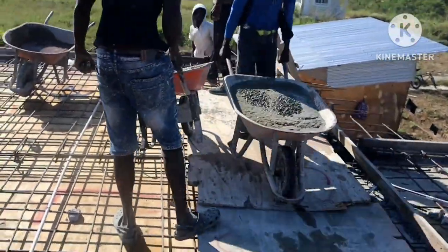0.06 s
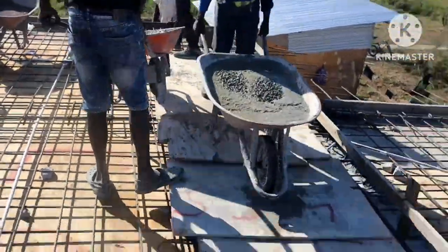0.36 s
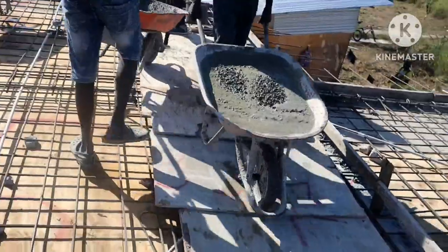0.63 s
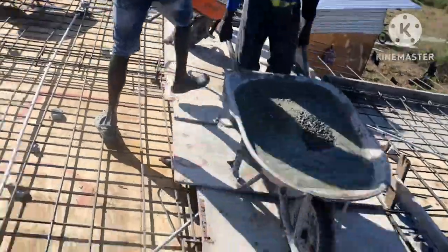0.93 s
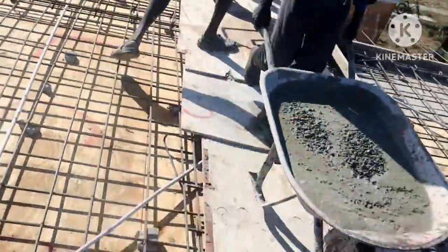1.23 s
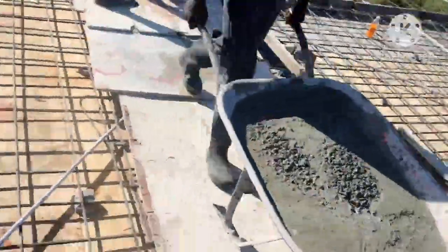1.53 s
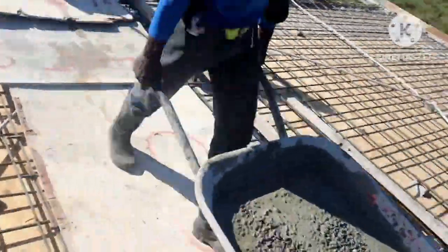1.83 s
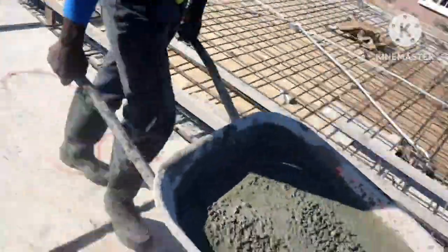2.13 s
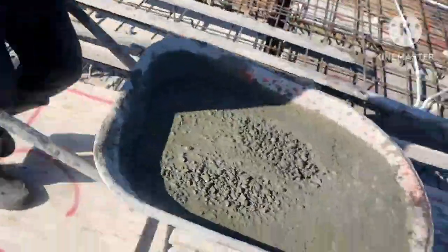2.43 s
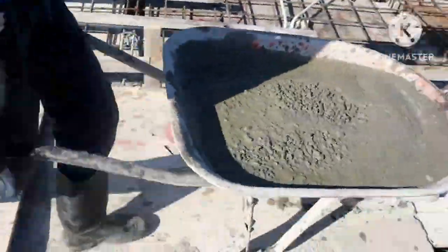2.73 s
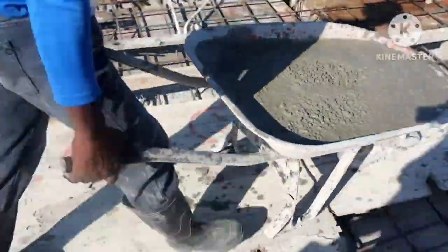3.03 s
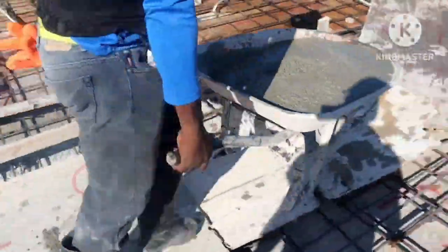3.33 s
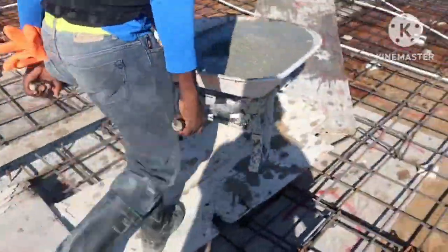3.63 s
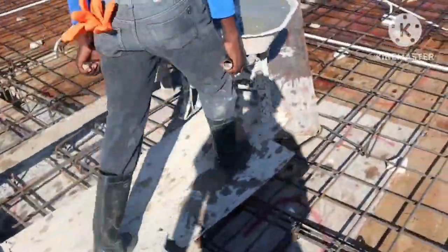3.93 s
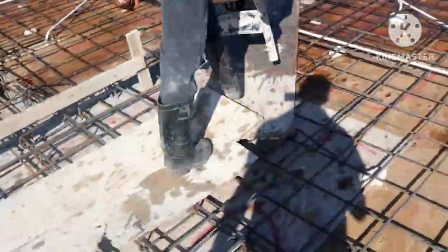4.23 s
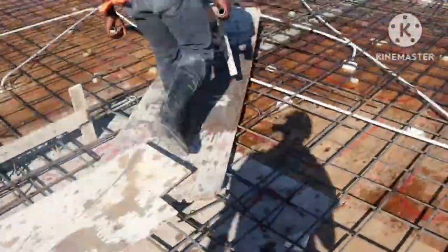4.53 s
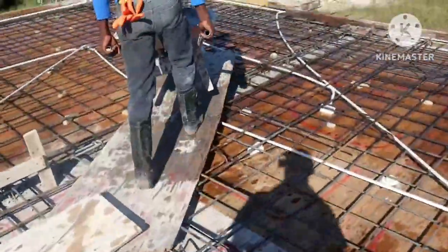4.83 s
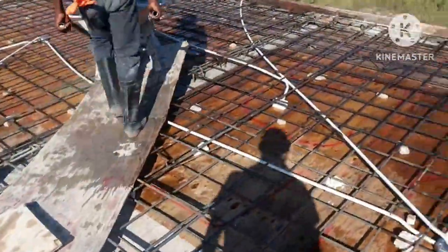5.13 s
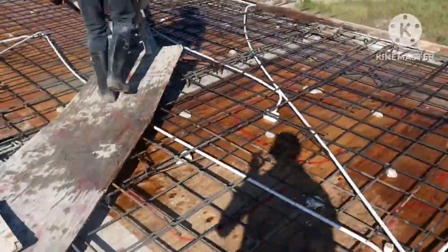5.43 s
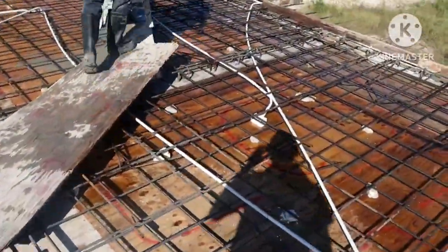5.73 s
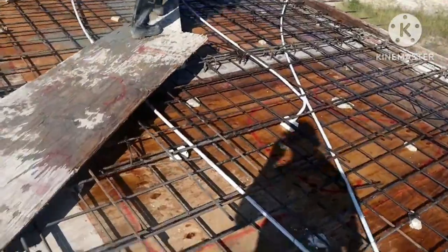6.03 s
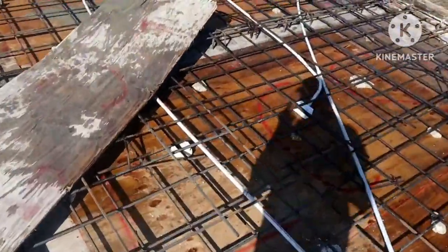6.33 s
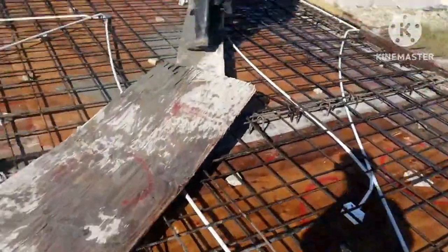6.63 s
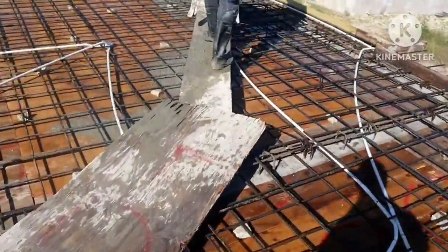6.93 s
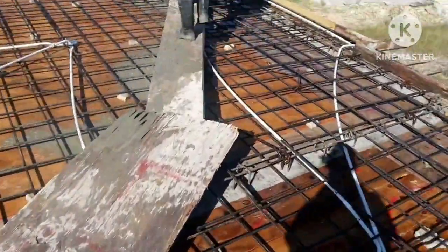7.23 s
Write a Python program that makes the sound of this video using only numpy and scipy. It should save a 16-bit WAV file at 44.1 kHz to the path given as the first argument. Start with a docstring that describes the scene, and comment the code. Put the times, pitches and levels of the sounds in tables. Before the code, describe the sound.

Gusty wind rushes on the microphone and a distant engine hums as a wheelbarrow bumps along boards in the open air. Hollow wooden knocks and metal clacks come thickly at first, mixed with gritty boot scuffs and ticking pebbles. The bass falls away as the barrow passes close by; afterwards the wind and engine build again, with rolling, scraping and sparser thuds.

```python
"""On a roof slab, a loaded wheelbarrow is pushed past over loose planks. The tyre rumbles and rocks the
boards; wheel and boots grind sand, snap small stones and knock the planks, and the steel tray clacks.
A small engine drones further off. Wind buffets the microphone, and the bass drops away while the
worker passes close by, sheltering it from the gusts and screening the engine."""
import sys
import numpy as np
from scipy import signal
from scipy.fft import rfft, irfft, next_fast_len
from scipy.io import wavfile
from scipy.ndimage import uniform_filter1d, map_coordinates

SR = 44100
rng = np.random.default_rng(int(sys.argv[2]) if len(sys.argv) > 2 else 0)


def transcribe(signal):
    """Save signal, clipped to [-1, 1], as a 16-bit WAV file at the path in sys.argv[1]."""
    frames = np.atleast_2d(signal).T
    limited = np.clip(frames, -1, 1)
    pcm = np.round(limited * 32767).astype(np.int16)
    wavfile.write(sys.argv[1], SR, pcm)


N = 329427
TIME = np.arange(N) / SR
AGE = np.arange(int(.4 * SR)) / SR  # seconds since a hit

# the wheel's steady rumble on the boards: time_s, level_db
WHEEL_RUMBLE = [(0, -28), (.5, -25), (.92, -30), (1.5, -25), (1.75, -31.5), (2.05, -27), (2.7, -34.5),
                (2.9, -32.5), (3.3, -27.5), (3.68, -38), (4.08, -37), (4.3, -27.5), (4.65, -31), (5.1, -29),
                (6.1, -24.5), (7.1, -32.5), (7.47, -27)]
# plank resonances: pitch_hz, level_db, t60_s (before a knock's damping factor)
PLANK_MODES = [(181.4, -2.5, 0.15), (219, 2.5, 0.13), (265.4, 1, 0.094), (349.4, 7.5, 0.081),
               (435, 13, 0.038), (528, 3, 0.15)]
# stereo width of wind and scuffs: frequency_hz, side_gain_db
NOISE_WIDTH = [(50, -24), (110, -18), (300, -13.5), (700, -11.5), (1290, -2.5), (2380, 4), (4400, 5.4),
               (15000, 3.8)]
# stereo width of rumble, ticks and knocks: frequency_hz, side_gain_db
IMPACT_WIDTH = [(200, -20), (700, -14), (1300, -9), (2400, -3), (4400, 0), (10000, 4)]


def amp(db):
    """Decibels to gain."""
    return 10 ** (np.asarray(db) / 20)


def unit(x):
    """Scaled to rms 1."""
    return x / np.sqrt(np.mean(x ** 2) + 1e-20)


def along(points, hz):
    """A curve of (frequency_hz, value) points, read on a log axis."""
    point_hz, values = np.transpose(points)
    return np.interp(np.log(hz + 1), np.log(point_hz + 1), values)


def curves(rows):
    """Automation: one value per sample for each column after the time."""
    times, *columns = np.transpose(rows)
    return [np.interp(TIME, times, column) for column in columns]


def wobble(rate):
    """A smooth random curve, rate knots a second."""
    return map_coordinates(rng.standard_normal(int(N * rate / SR) + 4), [TIME * rate])


def filtered(x, response):
    """x through an EQ whose gain is response(hz)."""
    size = next_fast_len(x.shape[-1] + 8192)
    return irfft(rfft(x, size) * response(np.fft.rfftfreq(size, 1 / SR)), size)[..., :x.shape[-1]]


def coloured(x, spectrum):
    """x given a spectrum, at rms 1."""
    return unit(filtered(x, lambda hz: amp(along(spectrum, hz))))


def patchy(x, depth_db):
    """x with a colour that shifts at random from moment to moment, at rms 1."""
    spectra = signal.stft(x, nperseg=1024)[2]
    patches = rng.standard_normal(spectra.shape[1:])
    for axis in (0, 1):
        patches = uniform_filter1d(patches, size=5, axis=axis)
    gain = amp(depth_db * np.tanh(unit(patches)))
    return unit(signal.istft(spectra * gain, nperseg=1024)[1][:, :N])


def grains(rate, spread_db, hiss):
    """Two trains of tiny impacts of uneven size over a bed of plain noise."""
    sizes = rng.standard_normal((2, N)) * amp(spread_db * np.clip(rng.standard_normal(N), -2, 2))
    impacts = unit(sizes * (rng.random(N) < rate / SR))
    return impacts + hiss * rng.standard_normal((2, N))


def ports(mid_side, width):
    """Left and right from mid and side; the microphone's two ports oppose each other in the treble."""
    side = filtered(mid_side[1], lambda hz: amp(along(width, hz)))
    return np.array([mid_side[0] + side, mid_side[0] - side])


def add(track, start_s, sound):
    """Mix a sound in at start_s."""
    part = track[..., max(round(start_s * SR), 0):][..., :sound.shape[-1]]
    part += sound[..., :part.shape[-1]]


def swell(peak_s, rise_s, fall_s):
    """An envelope that swells to a slightly rounded peak and fades."""
    return np.exp(-(np.abs(TIME - peak_s) / np.where(TIME < peak_s, rise_s, fall_s)) ** 1.6)


def decay(t60_s):
    """An envelope that falls 60 dB in t60_s."""
    return amp(-60 * AGE / t60_s)


def burst(x):
    """A hit scaled to the energy of 30 ms at rms 1."""
    return x / np.sqrt(np.sum(x ** 2, axis=-1, keepdims=True) / (.03 * SR))


def puff(low_hz, high_hz, t60_s, order=1):
    """Mid and side noise in a band, dying away."""
    high_hz = np.clip(high_hz, low_hz + 100, SR / 2 - 500)
    band = signal.butter(order, [low_hz, high_hz], "band", fs=SR, output="sos")
    return burst(signal.sosfilt(band, rng.standard_normal((2, len(AGE))) * decay(t60_s)))


def ring(modes, centre_hz, octaves, scatter_db, damping):
    """Modes struck at a new spot; the contact favours those near its own pitch."""
    hz, db, t60_s = np.transpose(modes)[:, :, None]
    detune, scatter = rng.standard_normal((2, len(modes), 1))
    level_db = db + scatter_db * scatter - 10 * (np.log2(hz / centre_hz) / octaves) ** 2
    partials = np.sin(2 * np.pi * hz * (1 + .04 * detune) * AGE)
    return np.sum(amp(level_db) * decay(t60_s / damping) * partials, axis=0)


def wind():
    """Eddies thump on the ports and a coarse, fluttering rush rides on them, brighter as it grows."""
    # strength of the rush of air: time_s, level_db
    strength = [(0, -25.5), (.5, -26.5), (1.05, -26.5), (1.3, -28.5), (1.6, -26.5), (2.1, -28),
                (2.65, -31.5), (2.9, -32), (3.3, -28), (4.08, -31), (4.35, -27.5), (4.65, -28.5),
                (5.15, -25), (6.05, -24.5), (6.5, -26), (6.85, -24.5), (7, -26.5), (7.47, -28)]
    # wind pressure on the microphone, sheltered while the worker passes: time_s, level_db
    gusts = [(0, -36), (.55, -29), (1.35, -29), (1.7, -37), (2.1, -25), (2.6, -32.5), (2.64, -57),
             (4.15, -67), (4.21, -39), (5.9, -40.5), (6.35, -26), (7.47, -28)]
    # tone of the low buffeting: frequency_hz, level_db
    buffet_eq = [(15, -22), (25, 4), (38, -6.5), (60, 4), (110, 3), (170, 1.5), (300, -6.5), (700, -83)]
    # tone of the rush: frequency_hz, level_db
    rush_eq = [(240, -20), (400, 2.5), (510, -3.5), (621, -1.5), (1170, -9), (1350, -8), (3240, -21.5),
               (6510, -32), (12300, -34.5), (13900, -34), (15000, -54)]
    eddies, strength_db = wobble(14), curves(strength)[0]
    buffet = amp(curves(gusts)[0] + 3.9 * eddies) * coloured(rng.standard_normal((2, N)), buffet_eq)
    air = patchy(coloured(grains(rate=900, spread_db=1.0, hiss=1.74), rush_eq), depth_db=3.5)
    shelf_hz, usual_strength_db = 200, -25.5
    lows = filtered(air, lambda hz: 1 / (1 + (hz / shelf_hz) ** 4))
    brightness = amp(0.58 * (strength_db - usual_strength_db))
    air = lows + brightness * (air - lows)
    flutter_db = 0.79 * eddies + 1.37 * wobble(60)
    rush = amp(strength_db + 0.5 + flutter_db) * air
    return ports(buffet + rush, NOISE_WIDTH)


def engine():
    """A small engine fires steadily, its harmonics wavering in the wind."""
    # harmonics of the firing rate: multiple, level_db
    harmonics = [(1, -4.5), (2, -9), (3, -10), (4, -9)]
    # the engine's loudness, screened while the worker passes: time_s, level_db
    loudness = [(0, -27.5), (1, -27), (2.58, -30.5), (2.66, -48), (4.1, -46), (4.5, -40.5), (5.2, -30),
                (6.6, -27), (7.47, -25.5)]
    firing_hz = 77 * (1 + 0.01596 * wobble(5))
    phase = 2 * np.pi * np.cumsum(firing_hz) / SR
    drone = sum(amp(db + 5.4 * np.tanh(wobble(5.6))) * np.sin(k * phase) for k, db in harmonics)
    return amp(curves(loudness)[0]) * drone


def plank_response(hz):
    """The boards as a bank of resonators; longer-ringing modes are narrower."""
    response = 0
    for mode_hz, level_db, t60_s in PLANK_MODES:
        bandwidth_hz = np.log(1000) / (np.pi * t60_s)
        loss = 1j * hz * bandwidth_hz
        response += amp(level_db) * loss / (mode_hz ** 2 - hz ** 2 + loss)
    return response


def rolling():
    """The tyre jolts the boards into resonance; each loose one booms at its own pitch as it rocks."""
    # tone of the tyre's jolts: frequency_hz, level_db
    jolt_eq = [(70, -15), (140, -3), (220, 2.5), (330, 3), (450, -13), (700, -14), (1200, -32), (3000, -80)]
    # loose boards rocking under the wheel: peak_s, level_db, swell_and_fade_s, pitch_hz
    rocking_boards = [(0.61, -20.5, 0.05, 246), (1.28, -20.5, 0.16, 268), (2.225, -22, 0.032, 222),
                      (2.53, -21.5, 0.039, 440), (5.6, -21.5, 0.045, 302), (6.3, -30, 0.084, 274)]
    jolts = coloured(grains(rate=420, spread_db=-1.1, hiss=0.77), jolt_eq)
    hollow = unit(filtered(jolts, plank_response))
    rumble = amp(curves(WHEEL_RUMBLE)[0]) * (1.095 * jolts + 0.12 * hollow)
    shaking = filtered(rng.standard_normal((2, N)), plank_response)
    booms, spread_octaves = np.zeros((2, N)), 0.49
    for peak_s, level_db, swell_s, pitch_hz in rocking_boards:
        boom = filtered(shaking, lambda hz: amp(-10 * (np.log2((hz + 1) / pitch_hz) / spread_octaves) ** 2))
        booms += amp(level_db) * swell(peak_s, swell_s, swell_s) * unit(boom)
    return ports(rumble + booms, IMPACT_WIDTH)


def scuffing():
    """The tyre grinds sand as it rolls; each scuff grinds harder and rubs the board beneath."""
    # tyre and soles scuffing: peak_s, rise_s, fall_s, sand_db, board_db
    scuffs = [(0.27, 0.31, .24, -31, -26), (0.875, 0.11, 0.085, -25.5, -32),
              (1.085, 0.094, 0.073, -29, -24), (1.419, 0.0077, 0.021, -28, -23.5),
              (1.87, .05, 0.11, -34.5, -46), (2.03, 0.19, 0.072, -40, -26.5), (2.37, .1, 0.044, -30, -34.5),
              (2.7, 0.24, 0.12, -35.5, -28), (3.258, 0.0091, 0.065, -26, -26),
              (3.425, 0.011, 0.064, -32, -22.5), (3.73, 0.025, 0.14, -35, -30),
              (4.26, 0.11, 0.093, -31.5, -22.5), (4.7, 0.36, 0.38, -41, -37.5),
              (5.16, .1, 0.13, -31.5, -26.5), (5.56, 0.16, .12, -30.5, -30), (6, 0.11, 0.087, -33.5, -23.5),
              (6.244, 0.0063, 0.029, -21, -24), (6.86, 0.1, 0.054, -46, -25.5),
              (7.349, 0.015, 0.048, -31, -25.5)]
    # tone of sand and pebbles: frequency_hz, level_db
    grit_eq = [(900, -34), (1800, -0.5), (3400, 0), (5500, -4.5), (7500, -9), (12500, -7.5), (15000, -18)]
    # tone of a rubbed board: frequency_hz, level_db
    rub_eq = [(220, -27), (450, 5.5), (900, 7), (1500, -5), (2200, -5.5), (4000, -20), (9000, -36)]
    grinding = amp(curves(WHEEL_RUMBLE)[0] - 14)
    rubbing = np.zeros(N)
    for peak_s, rise_s, fall_s, sand_db, board_db in scuffs:
        stroke = swell(peak_s, rise_s, fall_s)
        grinding = np.hypot(grinding, amp(sand_db) * stroke)
        rubbing = np.hypot(rubbing, amp(board_db) * stroke)
    # the sand hiss and wood rub shift colour at random from moment to moment
    sand = patchy(coloured(grains(rate=360, spread_db=3, hiss=1.9), grit_eq), depth_db=7.5)
    pebbles = coloured(grains(rate=54, spread_db=2.5, hiss=0.11), grit_eq)
    wood = patchy(coloured(grains(rate=700, spread_db=1.5, hiss=0.56), rub_eq), depth_db=4.5)
    judder = amp(1.3 * wobble(45))  # stick and slip
    grit = grinding * (0.65 * sand + .2 * pebbles)
    return ports(judder * (grit + rubbing * wood), NOISE_WIDTH)


def stone_ticks():
    """Small stones snap under wheel and boots: a sharp break, then a short crumble."""
    # snaps and small rattles: start_s, level_db, pitch_hz
    ticks = [(0.323, -30, 3150), (0.71, -31.5, 3800), (1.104, -35.5, 5400), (1.268, -38.5, 3330),
             (1.286, -42, 2800), (1.411, -34.5, 3300), (1.556, -38.5, 3700), (1.845, -34, 5060),
             (1.908, -29.5, 3000), (1.914, -32.5, 10500), (2.046, -36.5, 2200), (2.183, -43, 5030),
             (2.537, -38, 3200), (2.776, -39, 2560), (3.063, -49, 3480), (3.152, -48, 3960),
             (3.769, -47, 8540), (4.011, -51, 3140), (4.068, -48, 3500), (4.206, -35.5, 4800),
             (4.241, -29, 2070), (4.313, -38.5, 6200), (4.414, -45, 3000), (4.655, -43.5, 3400),
             (4.711, -43, 6200), (5.071, -44, 5500), (5.202, -36, 2400), (5.3, -37.5, 4000),
             (5.562, -40, 9150), (6.023, -31, 5160), (6.241, -32, 9050), (7.413, -27, 3960)]
    track = np.zeros((2, N))
    for start_s, level_db, pitch_hz in ticks:
        snap = puff(pitch_hz / 2, pitch_hz * np.sqrt(2), t60_s=.02, order=2)
        crumble = puff(pitch_hz / np.sqrt(2), pitch_hz * np.sqrt(2), t60_s=.07, order=2)
        add(track, start_s, amp(level_db) * (snap + .6 * crumble))
    return ports(track, IMPACT_WIDTH)


def knocks():
    """Each blow thuds in the plank, shakes the steel tray and cracks on the gritty surface."""
    # blows on the planks: start_s, thud_db, thud_hz, clack_db, clack_hz
    blows = [(0.564, -14.5, 255, -23, 640), (0.7184, -16, 263, -18, 1100), (0.74, -18.5, 248, -40, 900),
             (1.034, -24, 300, -26, 842), (1.062, -18.5, 243, -32, 745), (1.085, -20, 386, -28, 800),
             (1.103, -10, 318, -16, 940), (1.129, -17.5, 325, -33, 1010), (1.148, -15, 250, -41, 800),
             (1.193, -18.5, 293, -35, 800), (1.283, -18.5, 270, -34, 910), (1.307, -18.5, 262, -37, 900),
             (1.439, -17.5, 322, -32, 850), (1.845, -12.5, 266, -18.5, 600), (1.976, -18.5, 290, -35, 850),
             (2.372, -22.5, 347, -28, 1020), (2.485, -14, 200, -29, 433), (2.5901, -14.5, 238, -20, 1230),
             (2.704, -23.5, 366, -28, 945), (2.968, -21.5, 314, -32.5, 930), (3.064, -27, 383, -28, 1010),
             (3.151, -22.5, 344, -28, 950), (3.336, -29.5, 313, -31.5, 1040),
             (3.4105, -20.5, 358, -17, 875), (3.446, -21, 317, -30, 800), (3.541, -24.5, 370, -31, 990),
             (3.559, -27.5, 394, -25, 990), (3.997, -25.5, 294, -48, 700), (4.211, -26, 326, -24.5, 830),
             (4.24, -21.5, 274, -31, 800), (4.464, -21.5, 250, -37, 810), (4.636, -30, 324, -28.5, 780),
             (4.799, -21, 263, -32, 800), (5.49, -20.5, 370, -31, 600), (6.329, -21, 295, -30, 800),
             (6.407, -18, 310, -24, 635), (6.917, -14, 283, -26.5, 1150), (7.458, -23, 466, -24.5, 640)]
    # steel tray resonances: pitch_hz, level_db, t60_s (before the damping factor)
    tray_modes = [(493, 6, 0.097), (716, 10, 0.047), (863, -4, 0.094), (995, -5, 0.16), (1148, -5, 0.076),
                  (1614, 2.5, 0.039), (1990, 4.5, 0.027), (2450, 12, 0.03)]
    track = np.zeros((2, N))
    for start_s, thud_db, thud_hz, clack_db, clack_hz in blows:
        attack_s = 0.00017 * amp(-thud_db)  # gentler blows press in more slowly
        contact = 1 - np.exp(-AGE / attack_s)
        board = burst(contact * ring(PLANK_MODES, thud_hz, octaves=0.87, scatter_db=1.5, damping=0.79))
        push = burst(contact * np.sin(2 * np.pi * thud_hz * AGE) * decay(.034))  # the board gives way
        tray = burst(ring(tray_modes, clack_hz, octaves=0.96, scatter_db=4.5, damping=0.82))
        slap = burst(np.sin(2 * np.pi * clack_hz * AGE) * decay(.016))  # hard first contact
        thud_noise = puff(thud_hz, 1.53 * thud_hz, t60_s=0.15)
        clack_noise = puff(0.98 * clack_hz, 1.21 * clack_hz, t60_s=0.042)
        thud = amp(thud_db) * (0.84 * board + 0.59 * push + 0.28 * thud_noise)
        clack = amp(clack_db) * (0.68 * tray + 0.47 * slap + 0.5 * clack_noise)
        crack_db = clack_db - 18.5 + 15 * np.log2(clack_hz / 1000)  # harder, higher contacts crack more
        crack = amp(crack_db) * puff(1500, 4200, t60_s=0.05, order=2)
        # a narrow board radiates little below its own pitch
        low_cut = signal.butter(2, 0.42 * thud_hz, "high", fs=SR, output="sos")
        add(track, start_s, signal.sosfilt(low_cut, thud + clack + crack))
    return ports(track, IMPACT_WIDTH)


def scene():
    """The full mix, leaning left; the image closes up while the barrow is straight ahead."""
    # stereo automation: time_s, low_width_db, lean_amount
    image = [(0, 3.5, 1.9), (.7, 0.5, 1), (1.2, -2, 0.7), (1.6, -1.5, 2), (2.5, 7.5, 1.3), (2.64, -13, 0.3),
             (4.4, -16.5, 0.3), (6.2, -3.5, 1.15), (7.47, 3, 1.2)]
    # leftward lean at an amount of 1: frequency_hz, left_minus_right_db
    left_lean = [(100, 0), (350, .3), (700, 1.8), (1400, 2.6), (3000, 1.9), (6000, 2.3), (13000, .4)]
    mix = wind() + engine() + rolling() + scuffing() + knocks() + stone_ticks()
    width_db, lean = curves(image)
    crossover_hz = 1020  # the treble above stays wide
    low_side = filtered((mix[0] - mix[1]) / 2, lambda hz: 1 / (1 + (hz / crossover_hz) ** 2))
    mix += np.outer([1, -1], (amp(width_db) - 1) * low_side)
    leaning = filtered(mix, lambda hz: amp(np.outer([.5, -.5], along(left_lean, hz))))
    return mix + lean * (leaning - mix)


def record(dry):
    """The loudest knocks saturate, and a steep high cut takes off the very top."""
    ceiling, high_cut_hz = .96, 14300
    saturated = dry / (1 + np.abs(dry / ceiling) ** 6) ** (1 / 6)
    return filtered(saturated, lambda hz: (hz < 15700) / np.sqrt(1 + (hz / high_cut_hz) ** 60))


dry = scene()
out = record(dry)
transcribe(out)
```